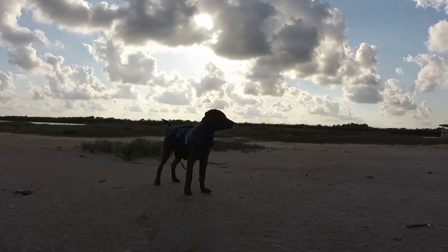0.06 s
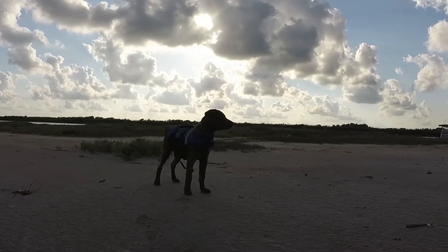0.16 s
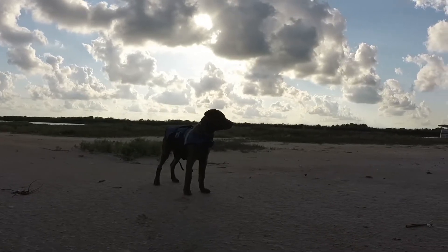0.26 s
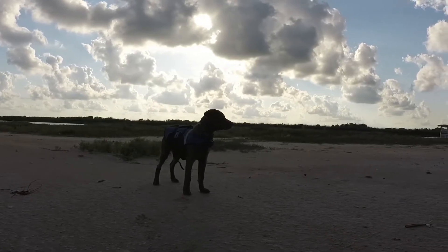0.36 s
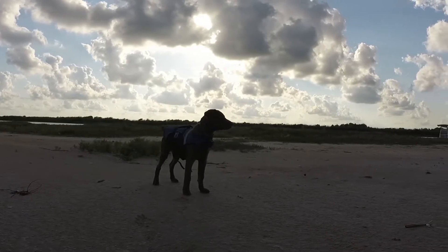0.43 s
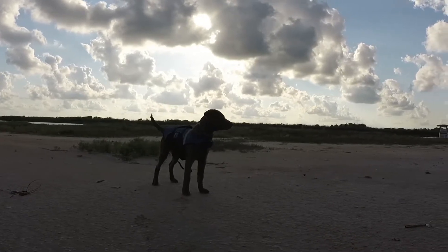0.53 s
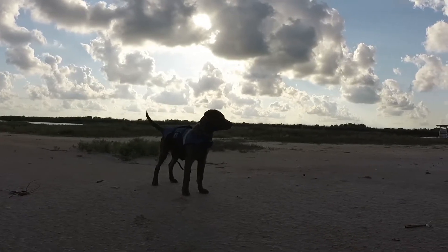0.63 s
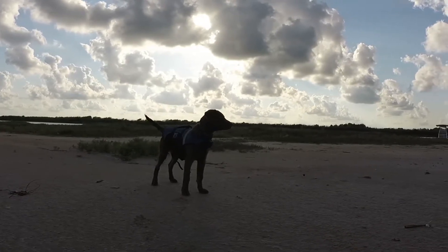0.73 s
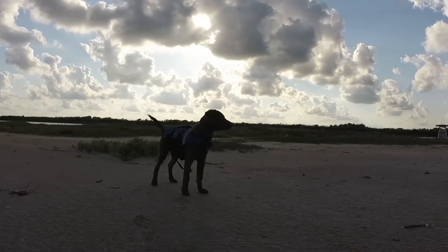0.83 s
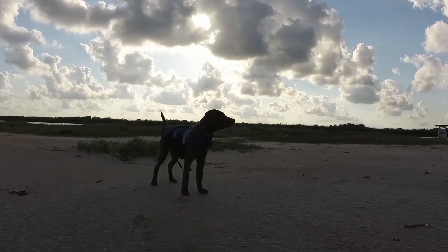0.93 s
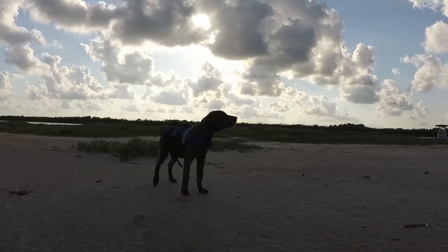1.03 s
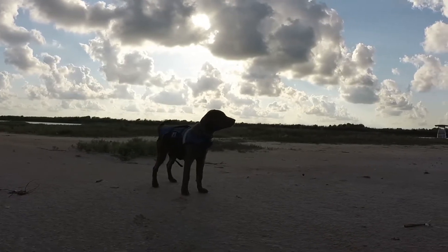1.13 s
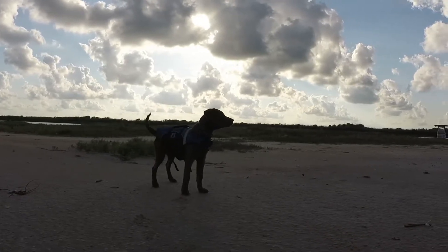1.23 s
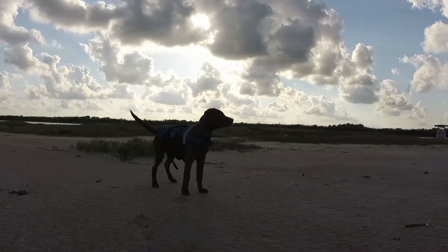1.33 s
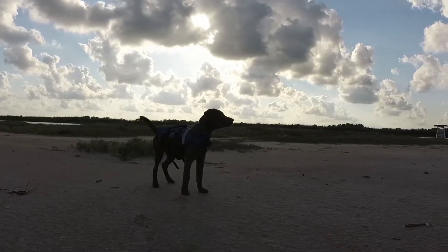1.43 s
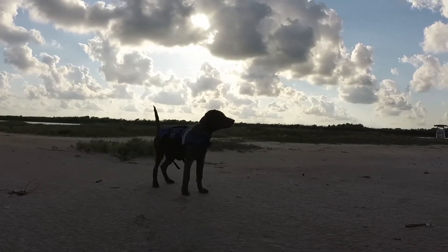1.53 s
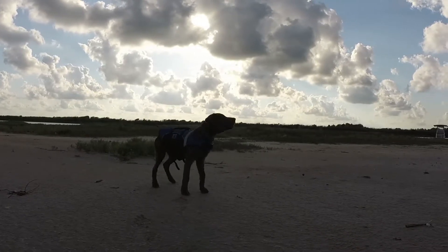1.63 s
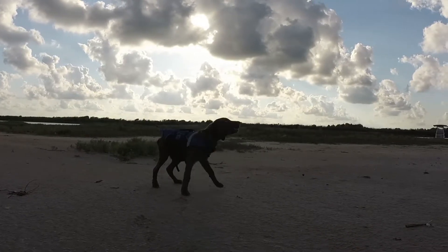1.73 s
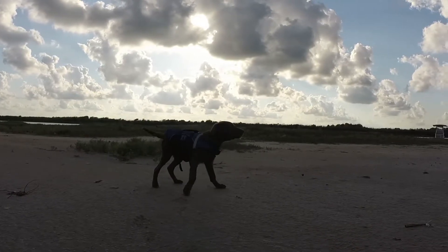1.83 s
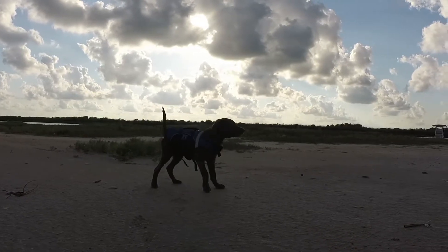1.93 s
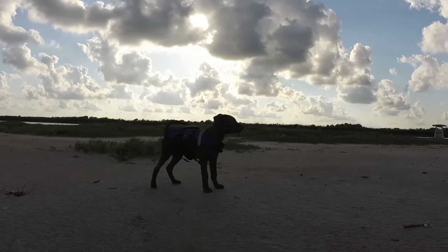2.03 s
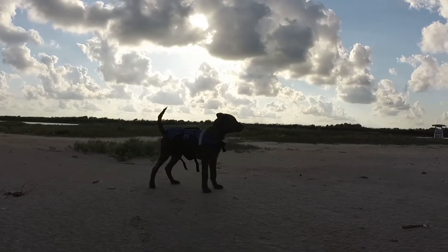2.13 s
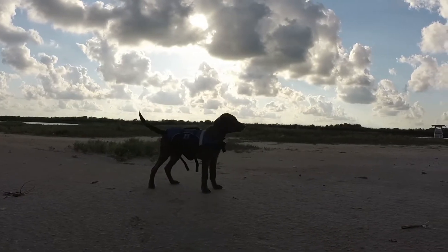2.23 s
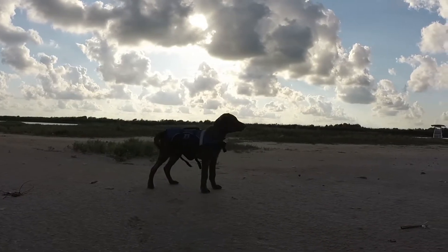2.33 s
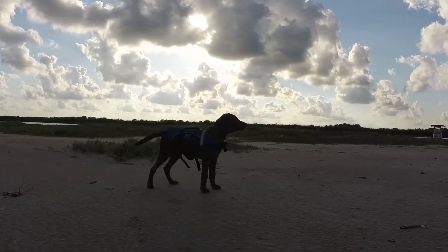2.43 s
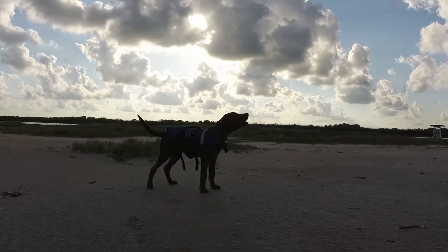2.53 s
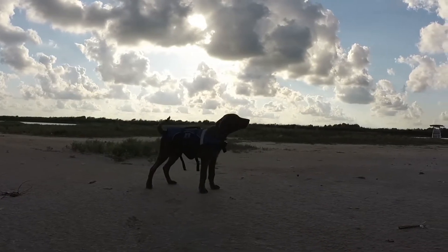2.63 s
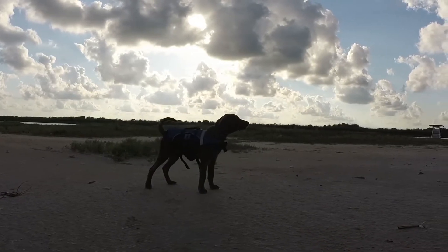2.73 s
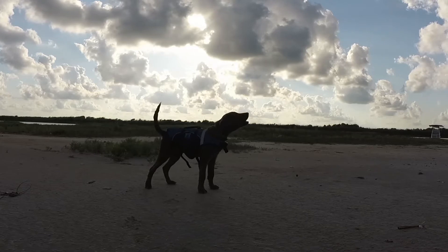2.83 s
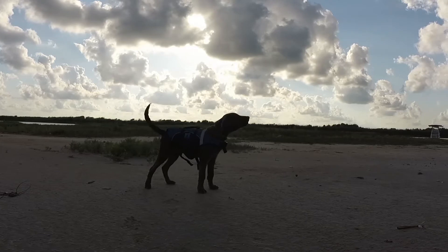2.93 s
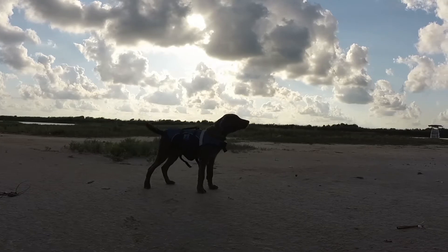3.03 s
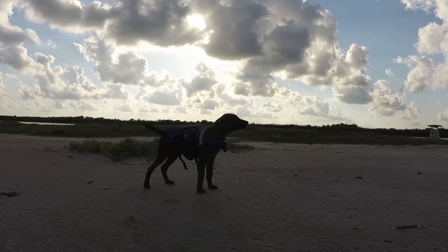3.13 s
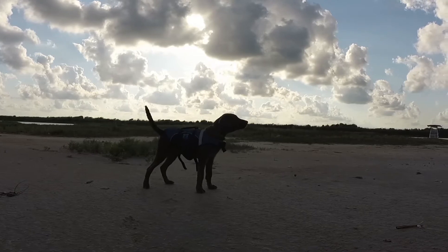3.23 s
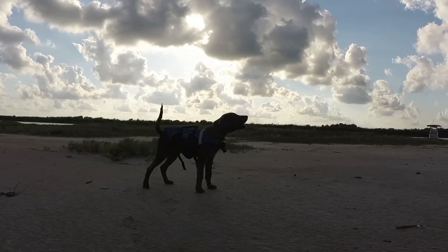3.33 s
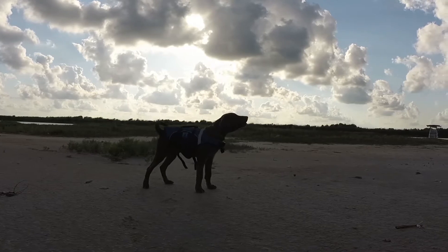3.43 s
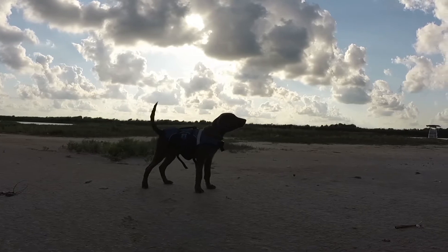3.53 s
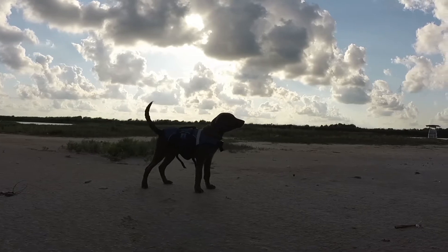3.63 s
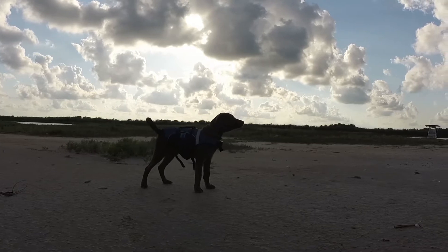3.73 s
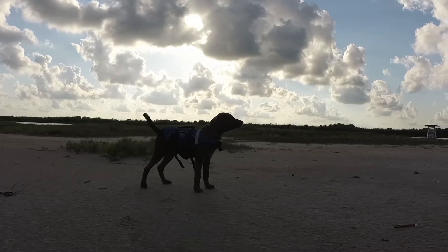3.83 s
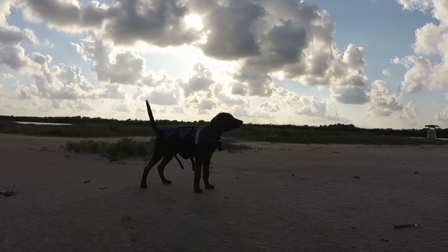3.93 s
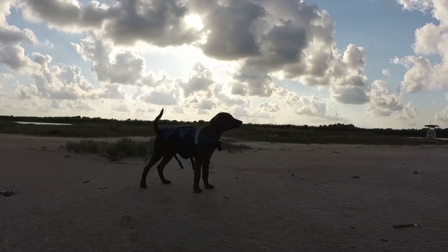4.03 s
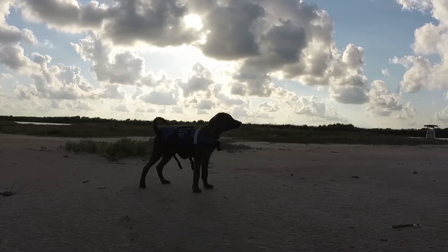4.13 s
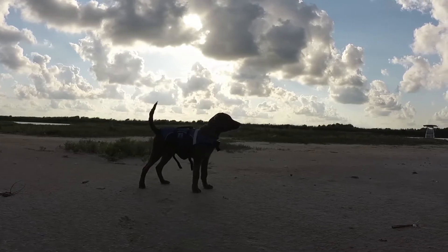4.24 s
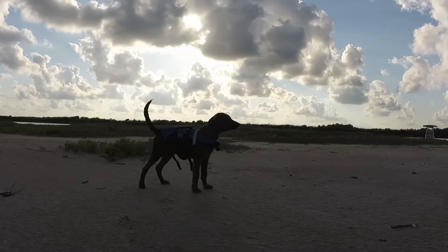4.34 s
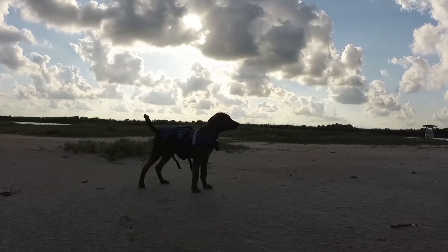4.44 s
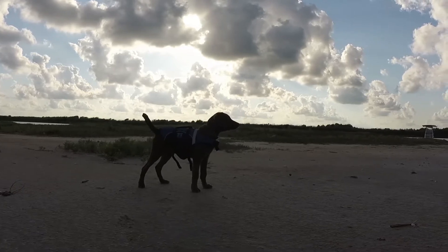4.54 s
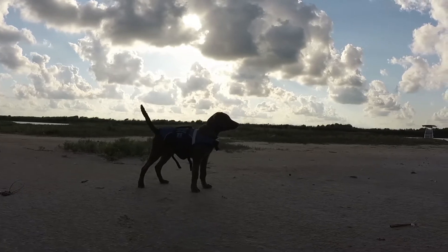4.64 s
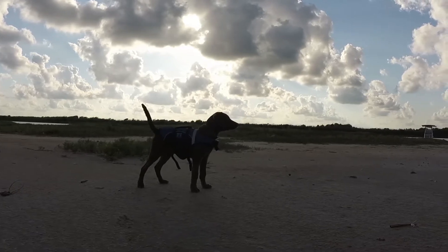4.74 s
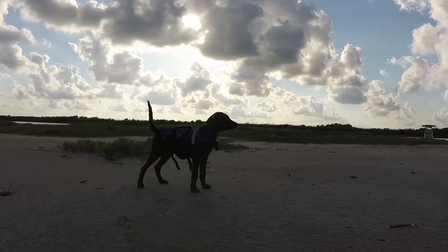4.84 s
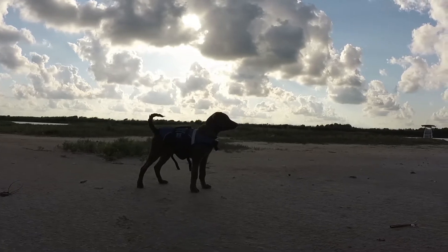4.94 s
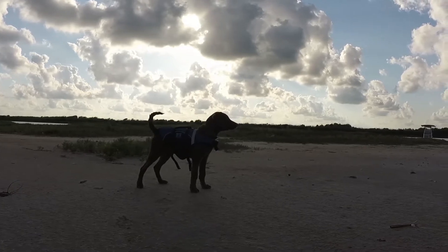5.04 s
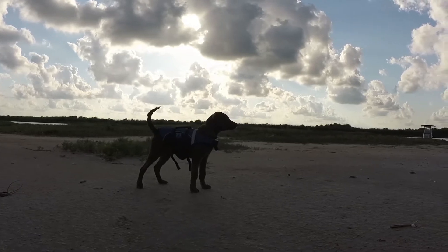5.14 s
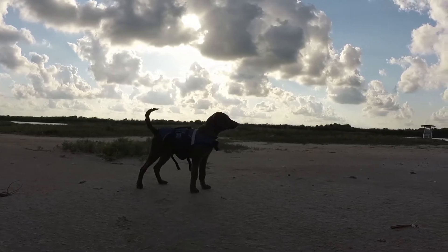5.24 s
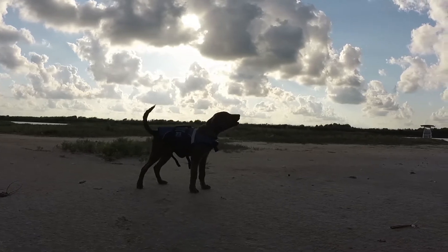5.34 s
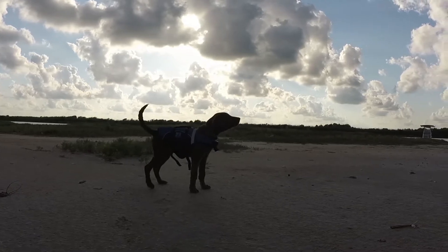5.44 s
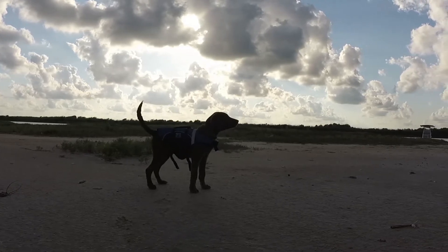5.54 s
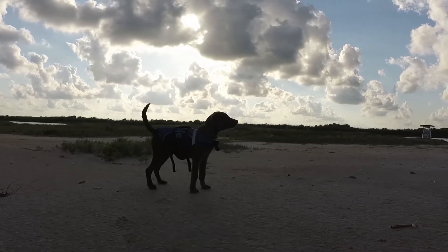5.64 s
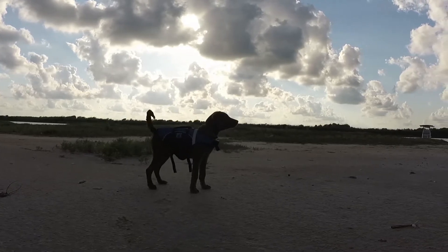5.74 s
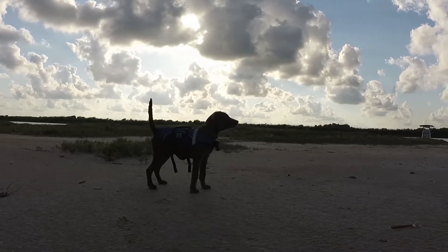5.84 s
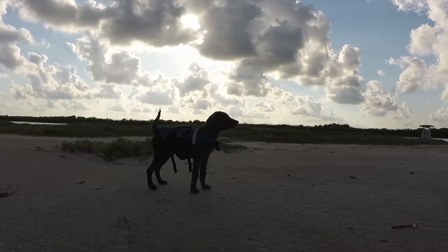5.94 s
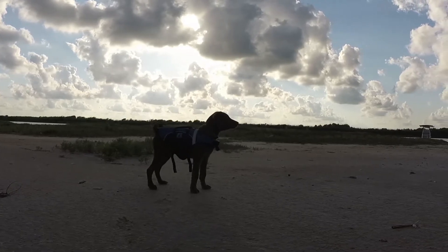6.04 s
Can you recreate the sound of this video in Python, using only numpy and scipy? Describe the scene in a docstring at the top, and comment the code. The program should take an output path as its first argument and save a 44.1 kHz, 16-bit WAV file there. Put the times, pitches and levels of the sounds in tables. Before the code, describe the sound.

An open beach, quiet but breezy. For the first second there is only low wind rumble with soft gusts bumping the microphone, a little stronger on the right, over very faint distant surf, thin insect hiss and a far motor hum. A tiny collar-tag clink comes at 0.5 s. A dog a few metres away barks sharply at about 1.05 s, then at 1.75, 2.6, 2.9 and 3.45 s, the third and fourth close together and the fifth somewhat weaker. Each bark is short, about a fifth of a second, mid-pitched and strongly voiced, with breathy, hoarse edges, a quick rise and falling end, and a faint diffuse echo. Light tag clinks fall near 1.3, 1.9 and 2.25 s. From 3.7 to 5.3 s only gusts, fluttering wind and the wavering motor remain. One last bark comes at 5.45 s, then breeze until about 6 s.

```python
"""Dog barking on an open beach

A dog gives six short barks a few metres away, each arched in effort, rough at the edges, voiced at its heart.
Barks are overtone series and puffed noise shaped by throat resonances; delayed noise tails return faint echoes.
A collar tag rings as decaying sines, and wind is coloured noise swelling in gusts at two microphone ports.
Underneath lie a far motor of two wavering hums, and distant surf and insects of steady coloured noise."""
import sys
import numpy as np
from scipy import signal
from scipy.fft import rfft, irfft, next_fast_len
from scipy.io import wavfile
from scipy.ndimage import uniform_filter1d, minimum_filter1d, map_coordinates

SR = 44100
rng = np.random.default_rng(int(sys.argv[2]) if len(sys.argv) > 2 else 0)


def dump_mix(stems):
    """Bounce the given channels to the path in sys.argv[1] as a 16-bit WAV at rate SR."""
    frames = np.atleast_2d(stems).T  # one column per channel
    limited = np.clip(frames, -1, 1)  # hard clip at full scale
    pcm = np.round(limited * 32767).astype(np.int16)
    wavfile.write(sys.argv[1], SR, pcm)


N = 267687
TIME = np.arange(N) / SR
SIZE = next_fast_len(N, real=True)


def gain_of(db):
    """Decibels to amplitude."""
    return 10 ** (np.asarray(db) / 20)


def evened(x):
    """Scaled to rms 1."""
    return x / np.sqrt(np.mean(x ** 2) + 1e-20)


def read(points, hz):
    """A spectrum table read on a log-frequency axis."""
    f, value = np.transpose(points)
    return np.interp(np.log(hz + 1), np.log(f + 1), value)


def add(mix, s, sound):
    """Lays a sound into the mix at time s."""
    part = mix[round(s * SR):][:len(sound)]
    part += sound[:len(part)]


def noise(spectrum, size):
    """Noise of rms about 1 with the given colour."""
    full = next_fast_len(size, real=True)
    colour = gain_of(read(spectrum, np.fft.rfftfreq(full, 1 / SR)))
    return evened(irfft(rfft(rng.standard_normal(full)) * colour, full)[:size])


def wander(hz, size):
    """Smooth chance of rms 1, with changes up to about hz a second."""
    smooth = 1 / (1 + (np.fft.rfftfreq(size, 1 / SR) / hz) ** 4)
    return evened(irfft(rfft(rng.standard_normal(size)) * smooth, size))


# colour of distant surf and insects: frequency_hz, relative_level_db
SHORE_COLOUR = [(60, -7), (260, -5.5), (450, -10.5), (620, -8), (850, -15.5), (1400, -19.5), (3000, -22),
                (7200, -25.5), (7800, -19.5), (8400, -26), (15000, -27.5)]
# left-right likeness of the distant shore: frequency_hz, likeness (0-1)
SHORE_LIKENESS = [(100, 0.6), (600, .6), (1400, 0.4), (3000, 0.1), (8000, 0)]


def shore(level_db=-58):
    """Distant surf and a thin band of insects: steady noise, wider in stereo as the pitch rises."""
    same = np.clip(read(SHORE_LIKENESS, np.fft.rfftfreq(SIZE, 1 / SR)), 0, 1)
    left, other = noise(SHORE_COLOUR, SIZE), noise(SHORE_COLOUR, SIZE)
    right = irfft(same * rfft(left) + np.sqrt(1 - same ** 2) * rfft(other), SIZE)
    return gain_of(level_db) * np.array([left, right])[:, :N]


# level course of a far motor: time_s, low_hum_db, high_hum_db
MOTOR_LEVELS = [(0, -54, -61.5), (2.3, -60, -55.5), (3.8, -56.5, -53.5), (6.07, -63, -54)]


def motor(low_hz=104, high_hz=132.8, waver=0.022, octave_db=-14):
    """Two hums, each with a soft octave, waver in pitch and level as they drift in on the wind."""
    s, *levels = np.transpose(MOTOR_LEVELS)
    out = np.zeros(N)
    for hz, db in zip((low_hz, high_hz), levels):
        angle = 2 * np.pi * np.cumsum(hz * (1 + waver * wander(15, N))) / SR
        level = gain_of(np.interp(TIME, s, db)) * (1 + 0.31 * wander(4, N))
        out += level * (np.sin(angle) + gain_of(octave_db) * np.sin(2 * angle))
    return np.sqrt(2) * out


# low and higher wind noise: frequency_hz, relative_level_db
RUMBLE_COLOUR = [(8, -13.5), (25, 2.5), (70, -2), (120, -9), (170, -15), (300, -31), (800, -60)]
FLUTTER_COLOUR = [(80, -13), (180, 2.5), (260, -1), (350, -10), (600, -22.5), (1200, -32), (1900, -31),
                  (4000, -41), (12000, -49)]
# gusts, levels before trim and stereo balance: centre_s, half_width_s, rumble_db, flutter_db
WIND_GUSTS = [(.15, 0.23, -46.5, -75), (.35, .035, -36.5, -63), (.62, .11, -38, -55),
              (.92, .17, -39.5, -50), (1.4, .22, -45.5, -68), (2.04, 0.037, -40.5, -68),
              (3.18, .12, -47.5, -49.5), (3.9, .06, -40.5, -57), (4.14, 0.16, -44, -49),
              (4.33, .025, -36, -60.5), (4.7, .1, -48.5, -68), (5.0, .035, -43, -58),
              (5.38, 0.13, -44, -58)]
CALM_RUMBLE_DB, CALM_FLUTTER_DB = -51, -64.5  # the breeze between gusts, before the same trims


def wind(rumble_trim_db=2.5, flutter_trim_db=0, left_vs_right_db=-7, lumpy_db=2):
    """Lumpy gusts swell out of a light breeze and buffet each port separately, the right one harder."""
    s, width, low_db, high_db = np.transpose(WIND_GUSTS)
    swells = np.exp(-((TIME[:, None] - s) / width) ** 2)
    # breeze and gusts add as power
    low_power = gain_of(CALM_RUMBLE_DB) ** 2 + swells @ gain_of(low_db) ** 2
    high_power = gain_of(CALM_FLUTTER_DB) ** 2 + swells @ gain_of(high_db) ** 2
    low = gain_of(rumble_trim_db) * np.sqrt(low_power)
    high = gain_of(flutter_trim_db) * np.sqrt(high_power)
    buffets = np.array([low * noise(RUMBLE_COLOUR, N) + high * noise(FLUTTER_COLOUR, N) for port in range(2)])
    balance = gain_of([[left_vs_right_db / 2], [-left_vs_right_db / 2]])
    return buffets * gain_of(lumpy_db * wander(39, N)) * balance


# colour of what the dunes return: frequency_hz, relative_level_db
DUNE_COLOUR = [(200, -20), (500, -5.5), (750, -0.5), (1000, 4.5), (1400, -8.5), (3000, -6), (8000, -16)]
# time for the dunes' echo to fall by 60 dB: frequency_hz, t60_s
DUNE_T60 = [(300, .9), (1000, 0.55), (1600, 0.28), (6000, .3)]


def dunes(x, fade_in_s=.02):
    """Scattered echoes from sand and scrub, each band dying at its own speed."""
    # noise partly shared by both sides
    hz, t, z = signal.stft(rng.standard_normal((2, SR)) + rng.standard_normal(SR), SR, nperseg=256)
    decay_db = 60 * t / read(DUNE_T60, hz)[:, None]
    z = z * gain_of(read(DUNE_COLOUR, hz)[:, None] - decay_db) * np.clip(t / fade_in_s, 0, 1)
    tail = signal.istft(z, SR, nperseg=256)[1] / np.sqrt(SR / 20)
    return signal.fftconvolve(x[None], tail, axes=1)[:, :N]


def near_scatter(x, level_db=-36, t60_s=0.6, crest_hz=3500):
    """Sand and scrub close by scatter a short, diffuse tail."""
    t = np.arange(SR // 3) / SR
    colour = [(300, -3), (crest_hz, 0), (15000, -10)]
    tails = np.array([noise(colour, len(t)) for port in range(2)])
    tails *= gain_of(-60 * t / t60_s) * np.clip(t / 0.0098, 0, 1)
    return gain_of(level_db) * signal.fftconvolve(x[None], tails / np.linalg.norm(tails[0]), axes=1)[:, :N]


def ports(x, lag_samples=0.53, shade_db=3.0, scatter=0.27, scatter_hz=2400):
    """Two microphone ports: the left hears later, with softer treble, and the housing scatters the treble."""
    hz = np.fft.rfftfreq(SIZE, 1 / SR)
    treble = hz ** 2 / (hz ** 2 + scatter_hz ** 2)
    ripple = rfft(evened(rng.standard_normal(330)) / np.sqrt(330), SIZE)
    # half of the lag and shade goes to each port
    half = gain_of(shade_db * treble / 2) * np.exp(1j * np.pi * hz * lag_samples / SR)
    side = scatter * treble * ripple
    return irfft(rfft(x, SIZE) * np.array([1 / half + side, half - side]), SIZE)[:, :N]


# collar tag strikes, tilt about 10 kHz: start_s, level_db, tilt_db_per_half_octave
TAG_STRIKES = [(.5103, -56, 3), (1.2808, -54, -0.5), (1.9296, -58, 16), (2.2422, -50.5, 1.5)]
# collar tag modes, level before the strike's own: frequency_hz, level_db, t60_s
TAG_MODES = [(6700, -9, 0.12), (10230, -10.5, .05), (12200, -15, .08), (13100, -10, .05)]


def tag():
    """The metal tag taps the collar with a tick of noise and rings briefly in a few modes."""
    out, t = np.zeros(N), np.arange(SR // 6) / SR
    for s, level_db, tilt_db in TAG_STRIKES:
        ring = np.zeros(len(t))
        for hz, db, t60 in TAG_MODES:
            mode_db = db + tilt_db * np.log2(hz / 10000) * 2
            ring += gain_of(mode_db - 60 * t / t60) * np.sin(2 * np.pi * hz * t)
        tick = 0.61 * rng.standard_normal(len(t)) * np.exp(-t / 0.0008)
        add(out, s, gain_of(level_db) * (ring + tick))
    return out


def voiced(spectrum, turns, hz, mouth, count=34):
    """The overtones of the vocal folds, weighted by the mouth's resonances."""
    k = np.arange(2, count)[:, None]
    weight = gain_of(read(spectrum, k * hz / mouth))
    # the throat delays each overtone differently, which spreads the pulse over the cycle
    lag = (k - 1) ** 2 / 4 + (k > 3) * rng.random(k.shape)
    overtones = weight * np.cos(2 * np.pi * (k * turns + lag))
    return overtones.sum(0) / np.sqrt((weight ** 2).sum(0) / 2)


def turbulent(spectrum, turns, mouth, throb=0.3):
    """Air noise in the same resonances, puffed once a cycle."""
    # reading the noise at the mouth's speed shifts its resonances
    hiss = map_coordinates(noise(spectrum, size=SR // 2), [np.cumsum(mouth)], order=3, mode="wrap")
    return evened(hiss * (1 + throb * np.cos(2 * np.pi * turns)))


REST_HZ, SAG_HZ_PER_S = 169.92, 1300  # pitch of the slack folds; sets how far the pitch sinks after the crest
REST_LOW_DB, REST_MID_DB, REST_RASP_DB = -51, -81, -83  # fundamental, overtones and rasp with the folds slack
BREAK_S, BREAK_JUMP = .003, .08  # a voice break at the crest: how quick, and by what share of the pitch
BREAK_LOW_DB, BREAK_MID_DB, BREAK_RASP_DB = 4.5, -8.5, -6  # the broken voice is rounder
LEAD_ATTACKS, TAIL_RELEASES = 1.95, 3.7  # a bark's span outside its heart, in attack and release times
# roughness of the edges; gained per dB of lost effort; gained as the voice gives out
ROUGH_EDGE, ROUGH_PER_DB, ROUGH_END = .95, 0.0343, 0.26
BREAK_CLEAN = 0.97  # share of the basic roughness that a full break clears
HISS_DB_PER_S, DULL_START_DB = 120, 3.5  # growth of the early hiss; overtones lacking while the mouth opens
JAW_S, LEAK_AFTER = .056, .55  # time the jaw takes to close; air leak as a bark ends, against its start


def gesture(row, swell_curve=1.3, fade_curve=1.45, glide_curve=1.6, rise_grip=.8, fall_grip=.42,
            opening_grip=.78, closing_grip=.56, rasp_grip=2.5, rasp_release_grip=1.05, clean_grip=1.7,
            break_grip=3.5, rasp_follow=.33, fade_follow=.85, spent_grip=0.59):
    """The course of one bark: folds engage, effort swells to a crest where the voice may break, then all sags."""
    onset, attack, rise, fall, release, start_hz, crest_hz, level_db, swell_db, fade_db = row[:10]
    overtone_db, upper_db, hoarse_db, hiss_db, crack, roughness, opening, jaw = row[10:]
    crest, end = onset + rise, onset + rise + fall
    t = np.arange(onset - LEAD_ATTACKS * attack, end + TAIL_RELEASES * release, 1 / SR)
    rising = t < crest
    # 0 slack, 1 in full voice
    engaged = np.exp(np.minimum(t - onset, 0) / attack - np.maximum(t - end, 0) / release)
    to_go, past = np.clip((crest - t) / rise, 0, 1), np.clip((t - crest) / fall, 0, 1)
    swelling_db, fading_db = -swell_db * to_go ** swell_curve, -fade_db * past ** fade_curve
    effort_db = swelling_db + fading_db
    broken = crack * (1 + np.tanh((t - crest) / BREAK_S)) / 2 * engaged ** break_grip

    def engage(rest, full, grip=1):
        """From the slack value to the full one; a higher grip arrives later and leaves sooner."""
        return rest + (full - rest) * engaged ** grip

    glide_hz = (start_hz - crest_hz) * to_go ** glide_curve
    sag_hz = SAG_HZ_PER_S * fall * past ** fade_curve
    sung_hz = crest_hz * (1 + BREAK_JUMP * broken) + glide_hz - sag_hz
    hz = engage(REST_HZ, sung_hz, np.where(rising, rise_grip, fall_grip))

    low_db = engage(REST_LOW_DB, level_db + effort_db + BREAK_LOW_DB * broken)
    bright_db = overtone_db + swelling_db - DULL_START_DB * to_go ** 2
    bright_db = bright_db + fade_follow * fading_db + BREAK_MID_DB * broken
    mid_db = engage(REST_MID_DB, bright_db, np.where(rising, opening_grip, closing_grip))
    full_rasp_db = hoarse_db + rasp_follow * effort_db + BREAK_RASP_DB * broken
    rasp_db = engage(REST_RASP_DB, full_rasp_db, np.where(rising, rasp_grip, rasp_release_grip))
    early_hiss_db = hiss_db + HISS_DB_PER_S * (t - onset)
    rasp_db = np.where(t < onset, np.maximum(rasp_db, early_hiss_db), rasp_db)

    heart = roughness * (1 - BREAK_CLEAN * broken) - ROUGH_PER_DB * effort_db + ROUGH_END * past ** 3
    rough = np.clip(engage(ROUGH_EDGE, heart, clean_grip), 0, 1)
    mouth = opening * (1 - jaw * np.clip((t - crest) / JAW_S, 0, 1))
    leak = 4 * engaged * (1 - engaged) * np.where(rising, 1, LEAK_AFTER)  # air through half-closed folds
    spent = past * engaged ** spent_grip
    return t, hz, low_db, mid_db, upper_db, rasp_db, rough, mouth, leak, spent


# colours of one bark, each frequency_hz, relative_level_db:
# the open mouth's low resonances, its upper resonance, the rasp, and the rasp's top
THROAT_COLOUR = [(250, -34.5), (520, -15), (690, -20.5), (950, -0.5), (1200, 5.5), (1460, 0.5),
                 (1680, -5.5), (1860, -8), (2000, -26.5), (2200, -36.5), (5000, -71.5)]
UPPER_COLOUR = [(1900, -45), (2200, -20), (2480, 1), (2780, -1), (2950, -11), (3100, -31), (3300, -44),
                (3650, -26), (4400, -24.5), (4950, -47.5), (7000, -69.5)]
RASP_COLOUR = [(3400, -50.5), (4250, -14.5), (4600, -17), (5100, -38), (5550, -6.5), (6100, 0), (6450, -2),
               (6850, -21.5), (7350, -3), (7900, -18.5), (9500, -45)]
SIZZLE_COLOUR = [(6000, -35), (7900, -5), (8800, 0), (9900, -2.5), (11000, -12), (15000, -10.5),
                 (17000, -30.5)]
# the low rush of air around a bark, and the throat's hollow ring as the voice gives out
HUFF_COLOUR = [(60, -24.5), (150, -6), (240, 1), (350, -5), (500, -12.5), (900, -41.5)]
HOLLOW_COLOUR = [(200, -50), (400, -22), (550, 1), (620, -4.5), (740, -28.5), (1500, -70.5)]


def bark(t, hz, low_db, mid_db, upper_db, rasp_db, rough, mouth, leak, spent, jitter=.055, shimmer=0.16,
         falter=.9, rasp_rough=2.5, ragged_db=2.5, sizzle_db=-9.5, sizzle_follow=0.36, dull_limit_db=-17,
         upper_follow=.2, huff_db=-53, leak_db=17.5, hollow_db=-1.5, rasp_jaw=.7, throat_gape=.5, hoarse=1.0):
    """One bark: a strong fundamental, overtones and rasp, all breaking up as roughness rises."""
    size = len(t)
    hz = hz * (1 + jitter * (0.038 + .8 * rough + rough ** 4) * wander(150, size))
    turns = np.cumsum(hz) / SR
    unsteady = shimmer * rough + falter * rough ** 4  # the folds falter as they start and stop
    fundamental = np.sqrt(2 / (1 + unsteady ** 2)) * np.cos(2 * np.pi * turns)
    fundamental *= 1 + unsteady * wander(100, size)
    huff = gain_of(huff_db + leak_db * leak) * noise(HUFF_COLOUR, size=SR)[:size]
    hollow = gain_of(hollow_db) * spent * rough ** 2 * noise(HOLLOW_COLOUR, size=SR)[:size]
    sound = gain_of(low_db) * (fundamental + hollow) + huff

    breathy = np.clip(rough * rasp_rough, 0, 1)  # the treble turns to noise first
    dull_db = np.maximum(mid_db - mid_db.max(), dull_limit_db)  # the higher resonances need full effort
    throat = mouth * mouth[0] ** throat_gape
    teeth = (mouth / mouth[0]) ** rasp_jaw  # the rasp sinks less with the jaw
    upper_level_db = mid_db + upper_db + upper_follow * dull_db
    rasp_level_db = rasp_db + ragged_db * wander(90, size)
    sizzle_level_db = rasp_db + sizzle_db + sizzle_follow * dull_db + ragged_db * wander(90, size)
    # colour, level in dB, share of air noise, shift of the resonances
    resonances = [(THROAT_COLOUR, mid_db, rough, throat),
                  (UPPER_COLOUR, upper_level_db, rough, mouth),
                  (RASP_COLOUR, rasp_level_db, breathy, teeth),
                  (SIZZLE_COLOUR, sizzle_level_db, np.sqrt(breathy), teeth)]

    depth = np.clip(hoarse * rough * (1 - spent), 0, 1)  # under strain, strong and weak cycles alternate
    doubling = (1 + depth * np.cos(np.pi * turns + wander(55, size))) / np.sqrt(1 + depth ** 2 / 2)
    for spectrum, db, air, shift in resonances:
        voice = np.sqrt(1 - air ** 2) * voiced(spectrum, turns, hz, shift)
        breath = air * turbulent(spectrum, turns, shift)
        sound += gain_of(db) * doubling * (voice + breath)
    return t[0], sound * signal.windows.tukey(size, .06)


# barks, with levels and crest pitch given before any voice break:
# onset_s, attack_s, rise_to_crest_s, fall_s, release_s, onset_pitch_hz, crest_pitch_hz,
# fundamental_db, swell_to_crest_db, fade_after_db, overtones_db, upper_resonance_vs_overtones_db, rasp_db,
# hiss_at_onset_db, voice_break (0-1), basic_roughness (0-1), mouth_opening (resonance factor),
# jaw_lowering (share of the resonances)
DOG_BARKS = [(1.056, .038, .043, 0.057, .018, 438.6, 499.4, -8, 18, 20, -14.5, -13, -40, -58.5, 0, 0.25, 1.028, .07),
             (1.763, .032, .032, .057, .017, 496.3, 523.4, -11.5, 1, 9, -10, -18.5, -35, -74, 0.14, .44, .98, .02),
             (2.609, .036, .039, .046, .04, 516, 490.7, -10.5, 2, 6.5, -10.5, -16.5, -38, -65, 1, .38, 1.0, .11),
             (2.919, .031, .041, .068, .031, 424, 485.5, -10.5, 8, 11.5, -10, -16.5, -38, -68, 0.99, .13, .99, .08),
             (3.427, .03, .073, .016, .048, 422.3, 469.5, -16.5, -0.5, 6.5, -15, -17, -40, -70, 0.52, 0.19, .99, .03),
             (5.428, .046, 0.0317, .043, .021, 469.8, 458, -11.5, 0, 9.5, -11.5, -14, -39.5, -54.5, .95, 0.29, 1.012, .1)]


def dog():
    """Six barks, each with its own course of pitch, effort and mouth."""
    out = np.zeros(N)
    for row in DOG_BARKS:
        add(out, *bark(*gesture(row)))
    return out


def scene():
    """The dog, its echoes and the beach."""
    barks = dog()
    direct = ports(barks + tag())
    echoes = near_scatter(barks) + gain_of(-36.5) * dunes(barks)
    return direct + echoes + wind() + shore() + motor()


def record(dry, edge_hz=15200):
    """A limiter eases the gain down on peaks above full scale; then a low-pass sets the band limit."""
    headroom = 1 / np.maximum(abs(dry).max(0), 1)
    gain = uniform_filter1d(minimum_filter1d(headroom, size=221), size=221)  # about 5 ms
    low_pass = signal.firwin(511, edge_hz, window=("kaiser", 9), fs=SR)
    return signal.oaconvolve(dry * gain, low_pass[None], "same")


dry = scene()
out = record(dry)
dump_mix(out)
```